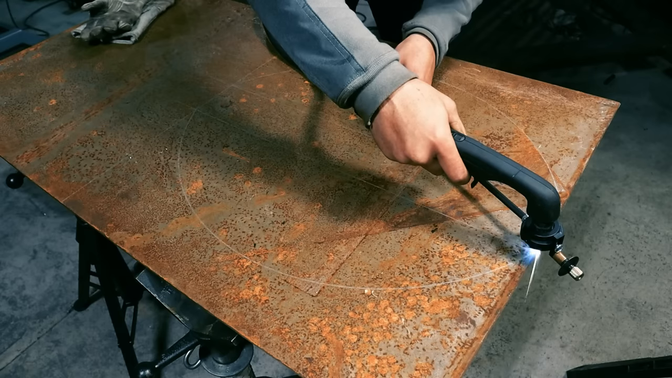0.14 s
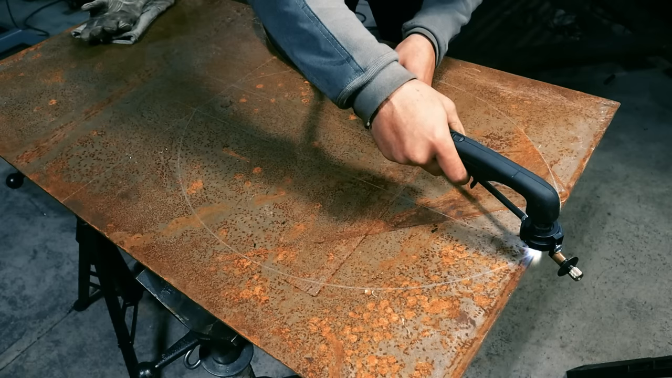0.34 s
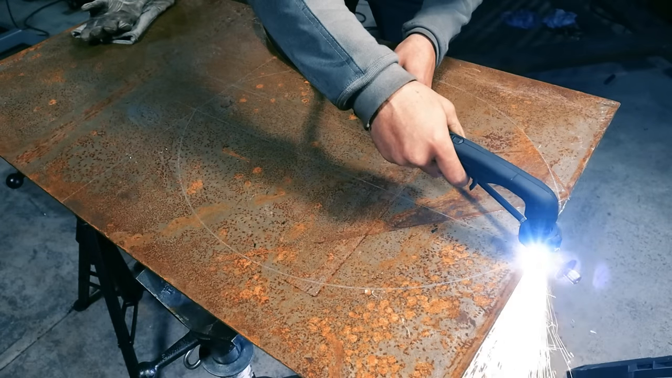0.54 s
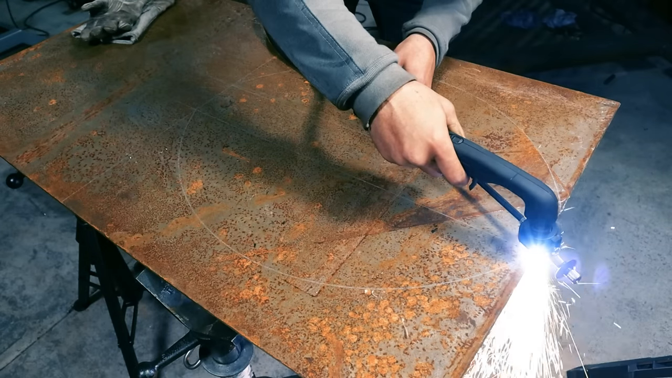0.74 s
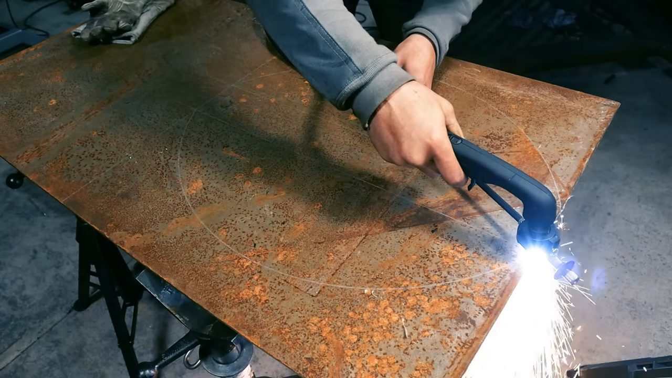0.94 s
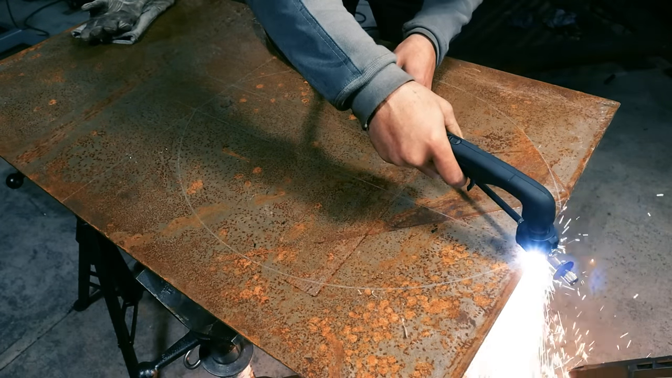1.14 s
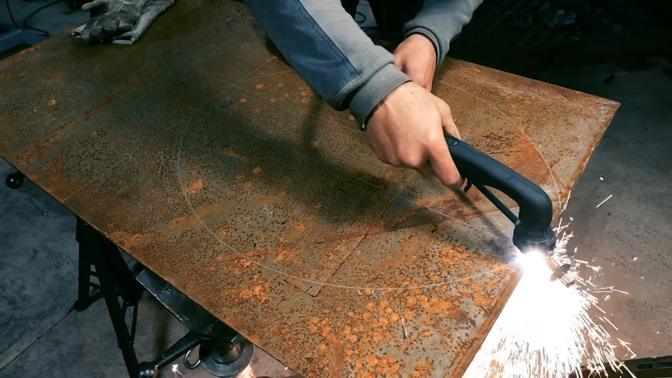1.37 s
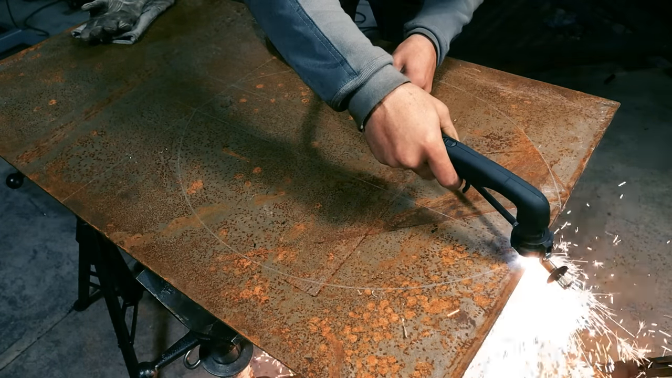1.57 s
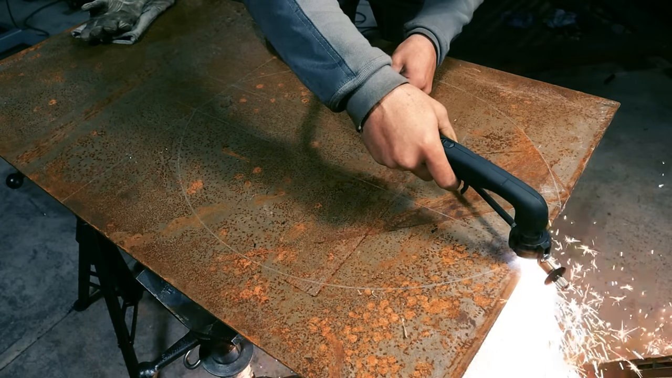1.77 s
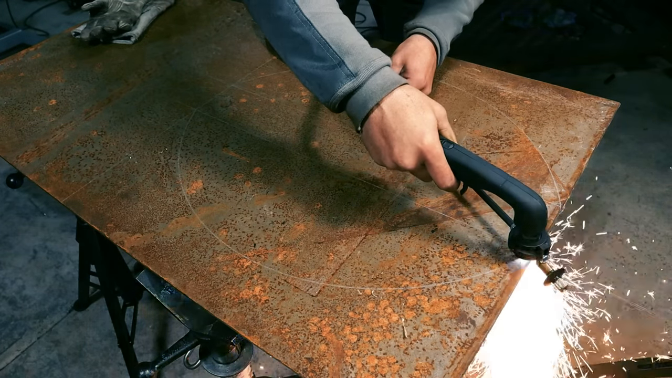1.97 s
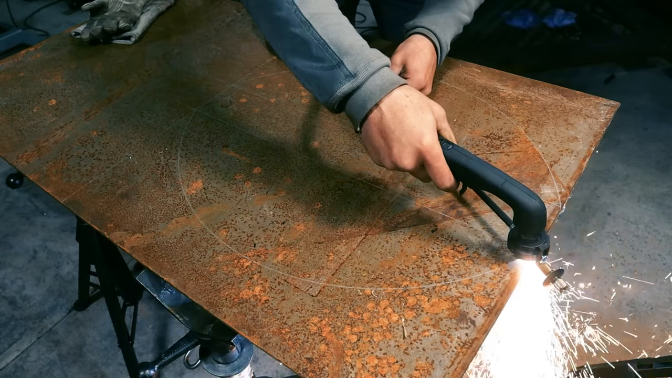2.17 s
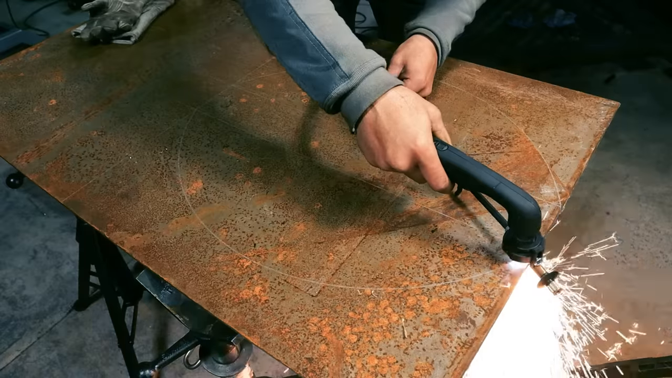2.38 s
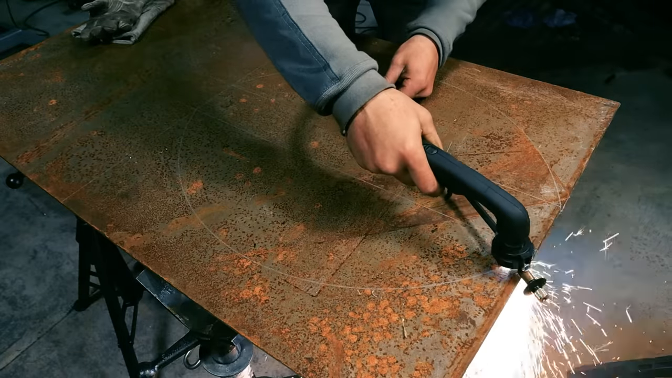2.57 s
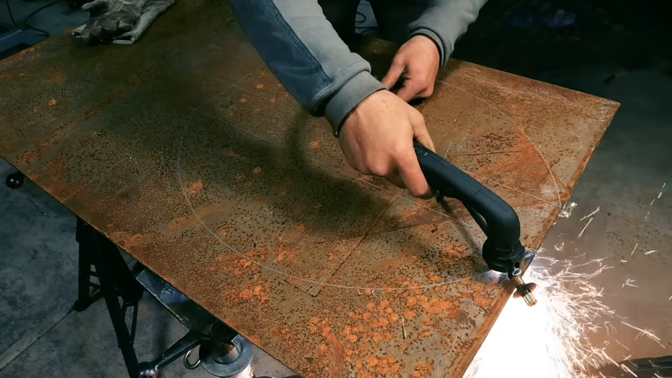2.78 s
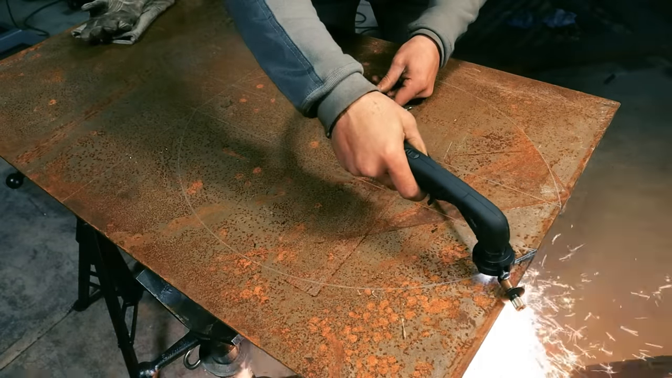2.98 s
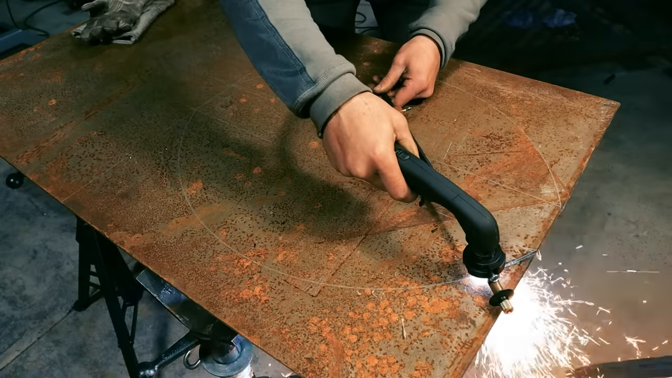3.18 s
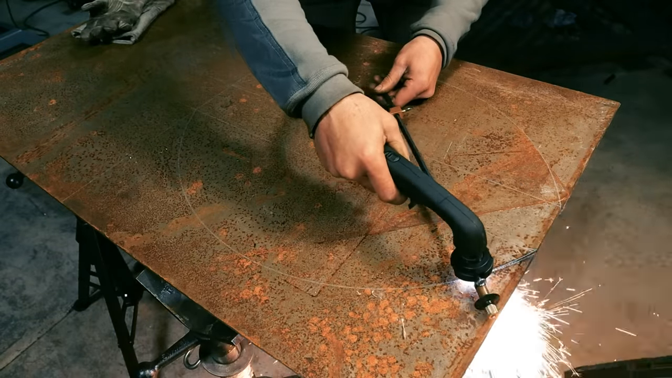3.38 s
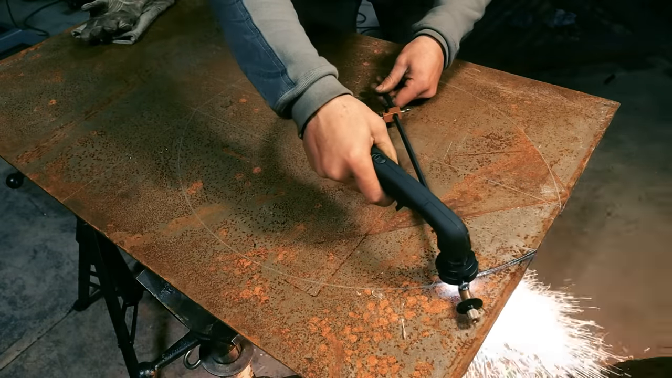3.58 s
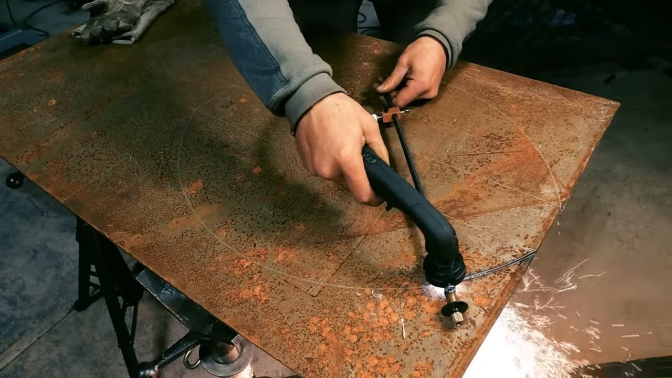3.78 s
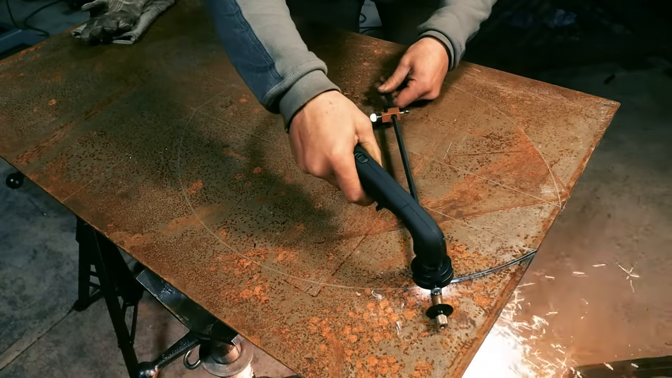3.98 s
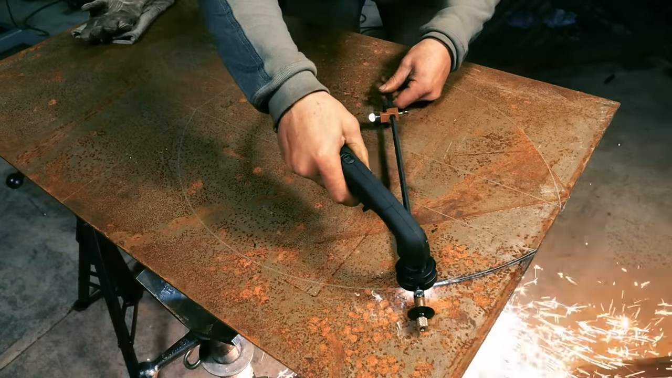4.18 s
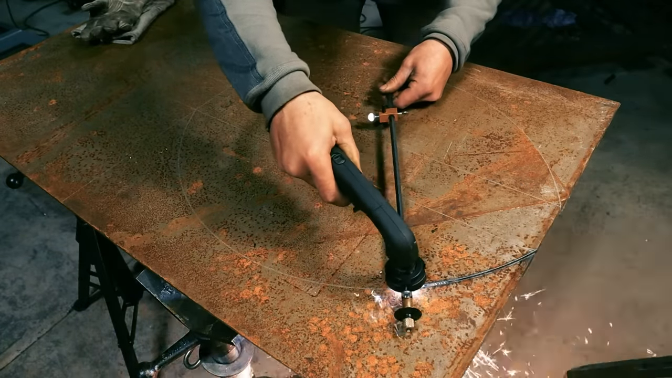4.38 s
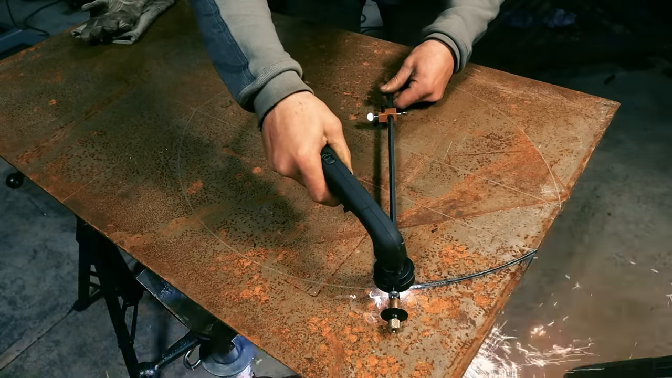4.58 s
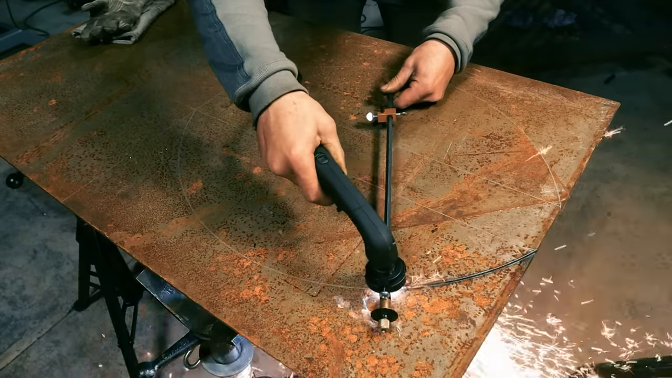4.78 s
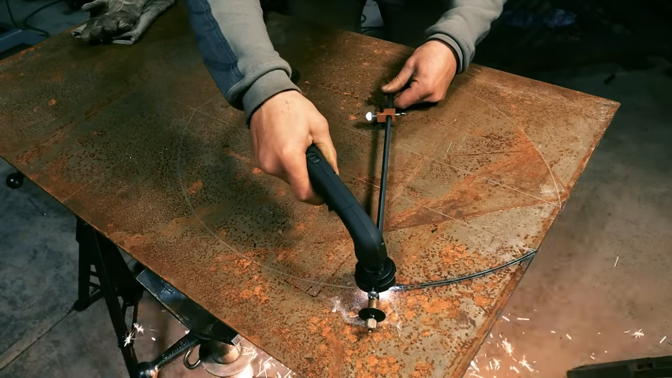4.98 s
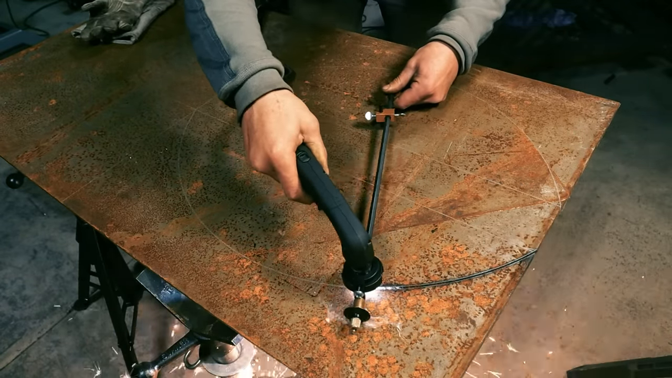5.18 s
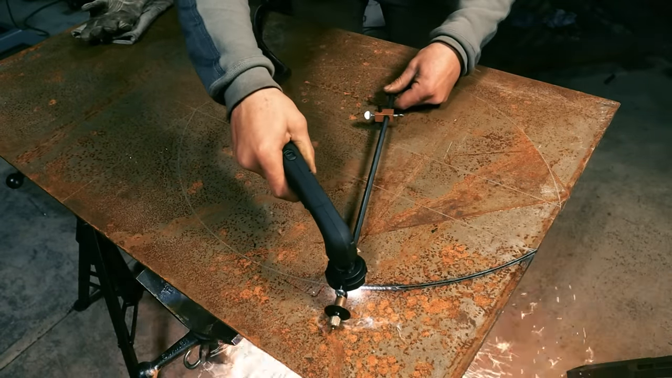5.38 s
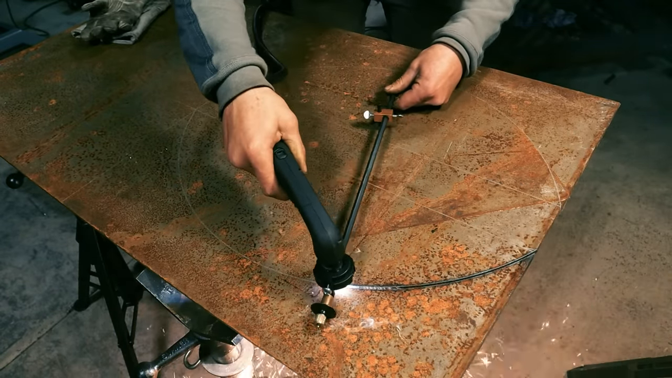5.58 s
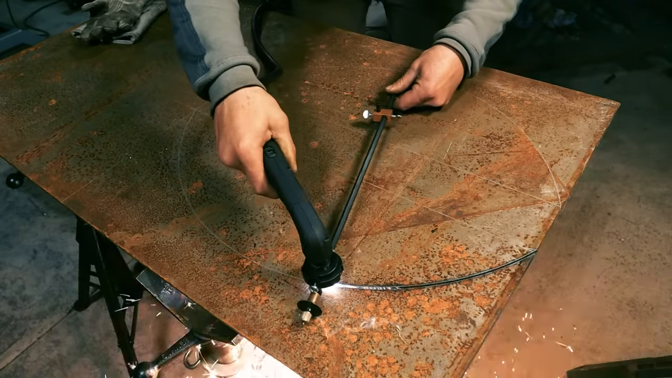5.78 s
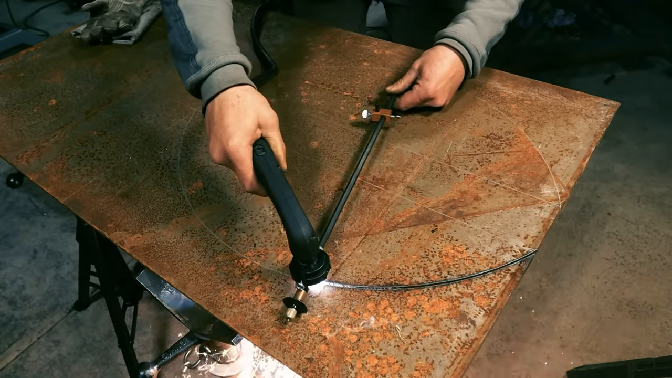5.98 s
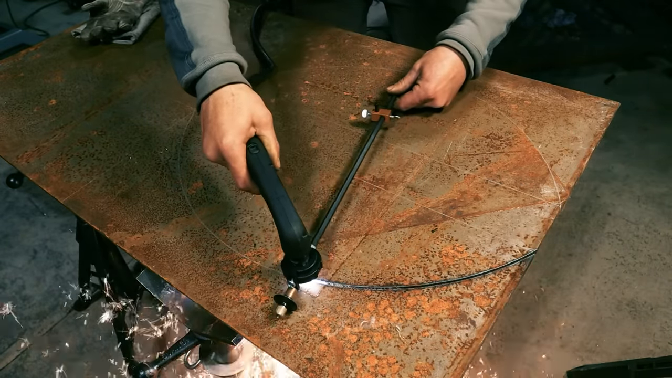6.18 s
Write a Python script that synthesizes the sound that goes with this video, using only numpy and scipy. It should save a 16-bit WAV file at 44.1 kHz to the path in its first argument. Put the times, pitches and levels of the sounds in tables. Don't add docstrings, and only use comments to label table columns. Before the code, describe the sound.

Digital silence until about 0.18 s, when a crisp double snap of a plastic trigger with a tiny rattle and brief ring appears over faint workshop noise. At 0.23 s air arrives with a bright tick and soft thud; at 0.265 s the plasma arc catches with a loud, slightly overloaded burst that settles quickly. A small breakthrough pop follows near 0.57 s, the lower roar filling out afterwards. The arc roars as dense, bright turbulent noise, strongest in the upper mids, easing slowly, dipping around 1.47 s and recovering. At 2.38 s it switches abruptly, without a fade, to a hiss roughly 20 dB quieter, thin, high and patchy, with little low body. It flickers with millisecond dips and surges, sags near 4.7 s, has a faint spark tick at 4.86 s, and continues to the end around 6 s. Close perspective, short hard workshop reflections, mostly centred.

```python
import sys
import numpy as np
from scipy import signal
from scipy.fft import rfft, irfft
from scipy.io import wavfile
from scipy.ndimage import uniform_filter1d

SR = 44100
rng = np.random.default_rng(int(sys.argv[2]) if len(sys.argv) > 2 else 0)


def master(y):
    cut = np.clip(np.atleast_2d(y).T, -1, 1)
    pcm = np.round(cut * 32767)
    wavfile.write(sys.argv[1], SR, pcm.astype(np.int16))


def decibels_to_gain(level_db):
    exponent = np.asarray(level_db, float) / 20
    return 10 ** exponent


N = 275184


def evened(x):
    return x / np.sqrt(np.mean(x ** 2) + 1e-20)


def read(points, hz):
    f, value = np.transpose(points)
    return np.interp(np.log(hz + 1), np.log(f + 1), value)


def add(mix, s, sound):
    mix[round(s * SR):][:len(sound)] += sound


def coloured(x, spectrum, peaks=()):
    hz = np.fft.rfftfreq(len(x), 1 / SR)
    bumps_db = sum(db / (1 + (2 * (hz - f) / width) ** 2) for f, width, db in peaks)
    gain = decibels_to_gain(read(spectrum, hz) + bumps_db)
    band = (hz > 2000) & (hz < 7000)
    return irfft(rfft(x) * gain, len(x)) / np.sqrt(np.sum(gain[band] ** 2) / len(hz))


def bandpassed_noise(count, low_hz, high_hz):
    sos = signal.butter(2, [low_hz, high_hz], "bandpass", fs=SR, output="sos")
    return evened(signal.sosfilt(sos, rng.standard_normal(count)))


def reflected(x, echo_db, t60, band_hz):
    delay = rng.uniform(.006, .12, 200)
    taps = np.zeros(6000)
    taps[(delay * SR).astype(int)] = rng.choice([-1., 1.], 200) * decibels_to_gain(echo_db - 60 * delay / t60)
    taps = signal.lfilter(*signal.butter(1, band_hz, "bandpass", fs=SR), taps)
    taps[0] = 1
    return signal.oaconvolve(x, taps)[:len(x)]


# (t/s, level/dB, length/s)
SURGES = [(0.454, 3, 0.0079), (0.55, -3, 0.019), (1.49, -2, 0.016), (1.538, 0.5, 0.011), (2.01, 1, 0.034),
          (2.778, -3.5, 0.029), (2.638, 0.5, 0.013), (2.86, 0.5, 0.033), (3.242, -4, .02),
          (3.816, 0.5, 0.012), (3.44, -3.5, 0.036), (4.252, -5.5, 0.026), (4.81, 2.5, 0.015),
          (4.848, 1, .008), (5.036, -4.5, 0.0088), (5.05, 4.5, 0.012), (5.13, -3, .01), (5.145, 3, 0.014),
          (5.409, -6.5, 0.018), (5.824, 1, 0.0098), (5.897, -5, 0.011)]


def jet(levels, patchy_db, drift_db, sputter_db, flicker_db):
    frames, hz = N // 64 + 5, np.fft.rfftfreq(256, 1 / SR)[:, None]
    t = np.arange(frames) * 64 / SR
    roar_db, jet_db, fizz_db, sizzle_db = levels(t)
    a, b, patches, drift = rng.standard_normal((frames, 129, 4)).T

    patches = evened(uniform_filter1d(uniform_filter1d(patches, size=5, axis=0), size=30, axis=1))
    drift = evened(uniform_filter1d(uniform_filter1d(drift, size=3, axis=0), size=300, axis=1))
    sputter = evened(uniform_filter1d(uniform_filter1d(rng.standard_normal(frames), size=12), size=12))
    flicker = evened(uniform_filter1d(rng.standard_normal(frames), size=3))
    surge_db = sum(db * np.exp(-((t - at) / length) ** 2) for at, db, length in SURGES)

    low, high, top = (1 / (1 + (edge / (hz + 1)) ** 8) for edge in (2000, 6500, 10000))
    field_db = (1 - low) * roar_db + (low - high) * jet_db + (high - top) * fizz_db + top * sizzle_db
    field_db = field_db + patchy_db * patches + drift_db * drift
    unsteady_db = sputter_db * sputter + flicker_db * flicker + surge_db
    field_db = field_db + unsteady_db * (1 - .25 * high - .4 * top)
    return signal.istft((a + 1j * b) * decibels_to_gain(field_db), nperseg=256, noverlap=192)[1][:N] / 11.3


def cutting(rows, follow, t):
    s, power_db, lift_db = np.transpose(rows)
    offset_db, power, lift, creep = np.transpose(follow)[:, :, None]
    level_db = power_db.mean() + offset_db + creep * (t - s.mean()) + lift * np.interp(t, s, lift_db)
    return level_db + power * np.interp(t, s, power_db - power_db.mean())


# (air alone level/dB, its climb/dB per s, strike flash level/dB, flash fade/s)
IGNITION = [
    (-18, -250, 17, 0.015),
    (-40, 430, 8.5, 0.018),
    (-58, 350, 7, 0.17),
    (-52.5, 650, 4, .03),
]


def struck(level_db, t):
    air_s, arc_s, rise_s = .230, .2635, .004
    air_db, climb, flash_db, fade = np.transpose(IGNITION)[:, :, None]
    air = decibels_to_gain(air_db + climb * np.clip(t - air_s, 0, arc_s - air_s)) * np.clip((t - air_s) / rise_s, 0, 1) ** 2
    lit = np.clip((t - arc_s) / rise_s, 0, 1)
    held_db = np.outer([-0.5, 0, 0, 0], t < 0.64)
    arc = decibels_to_gain(level_db + held_db + flash_db * np.exp(-np.maximum(t - arc_s - rise_s, 0) / fade))
    return 20 * np.log10((1 - lit) * air + lit * arc + 1e-6)


# (t/s, arc power level/dB, torch lift level/dB)
AT_EDGE = [(.33, -22.5, 0.5), (.55, -22, -.5), (.85, -23, -1), (1.15, -24, -1.5), (1.47, -28, 1.5),
           (1.56, -23.5, 2), (1.73, -26.5, 2), (2.0, -24.5, 1), (2.37, -25, 0)]
# (offset level/dB, share of arc power, share of torch lift, creep/dB per s)
EDGE_FOLLOW = [
    (-1.5, 1, .3, 1.3),
    (-1.5, 0.83, 0, 0),
    (-2, 0.39, .4, -1.5),
    (-2, 0.61, 1.0, -1.2),
]
# (f/Hz, level/dB per Hz)
EDGE_COLOUR = [(25, -45), (120, -33), (300, -24), (600, -25.5), (1100, -10), (1900, -9.5), (3400, -2),
               (4100, -6.5), (5200, -6.5), (7600, -10.5), (9500, -6.5), (12700, -11.5), (14400, -8),
               (15700, -21.5)]
# (f/Hz, width/Hz, level/dB)
EDGE_PEAKS = [(480, 90, 7.0), (660, 150, 7.0), (880, 410, 7.0), (1050, 140, -5.5), (1210, 230, -4.5),
              (1530, 160, -3.0), (1900, 90, -2.0), (2360, 200, 2.5), (2500, 170, -2.0), (2860, 80, 3.0),
              (3560, 180, 3.0), (3750, 80, 2.5), (4470, 500, 2.0), (5010, 500, 4.0), (5320, 130, -2.0),
              (5620, 130, 3.0), (6200, 370, 2.0), (6730, 120, 1.5), (7380, 60, 1.5), (8030, 70, 1.5),
              (8350, 90, -3.0), (8450, 130, 2.0), (10140, 330, -4.0), (10490, 500, 2.0), (11030, 360, 3.5),
              (11160, 170, -4.5), (14200, 290, -2.5), (15690, 480, 7.0)]


def edge_cut():
    arc = jet(lambda t: struck(cutting(AT_EDGE, EDGE_FOLLOW, t), t),
              patchy_db=0.6, drift_db=0.5, sputter_db=-0.04, flicker_db=0.38)
    arc = decibels_to_gain(1.5) * coloured(arc, EDGE_COLOUR, EDGE_PEAKS)
    return reflected(arc, echo_db=-25, t60=.35, band_hz=[400, 12000])


# (t/s, arc power level/dB, torch lift level/dB)
INSIDE_CUT = [(2.4, -43.5, 1), (2.85, -43, 0), (3.35, -44, -0.77), (3.55, -43.5, 0.9), (4.0, -45.5, -0.097),
              (4.45, -45, 0), (4.72, -48.5, 0), (5.1, -45.5, 0), (6.2, -45, -1)]
# (offset level/dB, share of arc power, share of torch lift, creep/dB per s)
INSIDE_FOLLOW = [
    (-1.5, 0.89, .3, -0.2),
    (-1.72, 0.77, 0.17, 0),
    (-1.3, 0.51, .4, -0.54),
    (-1.2, 0.35, 1.0, -0.6),
]
# (f/Hz, level/dB per Hz)
INSIDE_COLOUR = [(25, -43.5), (120, -43.5), (300, -34.5), (600, -24.5), (1000, -22.5), (1500, -12.0),
                 (2500, -13.5), (3200, -1.5), (4000, -18.5), (5000, -3.0), (7000, -9.5), (9500, -6.5),
                 (13000, -4.5), (15700, -1.0)]
# (f/Hz, width/Hz, level/dB)
INSIDE_PEAKS = [(540, 60, -2.5), (690, 90, -3.5), (860, 130, -3.0), (1310, 200, -5.5), (1600, 130, -5.0),
                (1950, 70, -4.0), (2170, 170, -3.5), (2590, 120, -6.5), (2720, 50, -4.0), (2910, 60, -4.0),
                (3090, 90, -7.0), (3320, 500, -5.5), (3600, 60, 4.0), (3730, 50, 2.5), (4050, 430, 7.0),
                (4370, 160, 7.0), (4820, 80, 4.0), (5270, 60, -5.0), (5820, 170, 4.5), (6110, 50, 4.5),
                (6400, 50, 4.0), (6670, 500, 4.5), (7380, 180, 4.5), (8100, 370, 3.0), (9170, 380, 1.5),
                (9770, 250, -2.0), (11960, 50, 2.5), (13600, 260, -2.0)]


def inside_cut():
    arc = jet(lambda t: cutting(INSIDE_CUT, INSIDE_FOLLOW, t),
              patchy_db=1.2, drift_db=0.52, sputter_db=0.7, flicker_db=1.16)
    arc = decibels_to_gain(3.0) * coloured(arc, INSIDE_COLOUR, INSIDE_PEAKS)
    return reflected(arc, echo_db=-21, t60=0.25, band_hz=[400, 10000])


# (t/s, level/dB, low f/Hz, high f/Hz, t60/s)
PUFFS = [
    (.2325, -38, 300, 800, .1),
    (.2405, -38, 60, 400, .03),
    (.2395, -31, 1500, 4500, .012),
    (.2655, -24, 250, 650, .02),
    (.574, -33, 60, 1500, .025),
    (4.861, -38, 3300, 5200, .025),
    (4.862, -50, 700, 2600, .02),
]
# (t/s, level/dB)
SPATTER = [(2.85, -90), (3.06, -88), (3.2, -82), (3.24, -88), (3.46, -90), (3.71, -86), (4.27, -88),
           (4.86, -86), (5.47, -84)]
# (t/s, level/dB)
THUMPS = [
    (0.2405, -29.5),
    (0.2662, -30),
    (0.5732, -43),
]


def pops():
    out, t = np.zeros(N), np.arange(3000) / SR
    for s, db, low_hz, high_hz, t60 in PUFFS:
        envelope = decibels_to_gain(db - 60 * t / t60) * np.minimum(t / 0.0013, 1)
        add(out, s, envelope * bandpassed_noise(len(t), low_hz, high_hz))
    push = np.e * t / 0.00062 * np.exp(-t / .001)
    for s, db in SPATTER:
        add(out, s, decibels_to_gain(db) * push)
    thump = signal.lfilter(*signal.butter(2, 112, "highpass", fs=SR), push)
    for s, db in THUMPS:
        add(out, s, decibels_to_gain(db) * thump)
    return out


# (f/Hz, level/dB per Hz)
TRIGGER = [(100, -20), (700, -16), (1700, -20), (2400, -5), (3600, -4), (4700, 0), (5300, -2), (6200, -16),
           (7800, -9), (9500, -17), (12000, -13), (15700, -20)]
# (f/Hz, level/dB, length/s)
LATCH = [
    (4700, -22, 0.0017),
    (3100, -28.5, 0.0012),
]


def trigger():
    out, t = np.zeros(N), np.arange(2048) / SR - .004
    snaps = np.zeros(len(t))
    snaps[[161, 176]] = [-.3, 1]
    snaps = coloured(snaps, TRIGGER, [(4850, 700, 7), (3000, 900, 4)])
    snaps = decibels_to_gain(-25) * snaps / abs(snaps).max() * np.exp(-(t / .003) ** 2)
    rattle = evened(coloured(rng.standard_normal(len(t)), TRIGGER))
    rattle = rattle * decibels_to_gain(-38 - 60 * abs(t) / np.where(t > 0, .035, .008))
    add(out, .1799, snaps + rattle)
    for hz, db, length in LATCH:
        u = np.arange(0, length, 1 / SR)
        ring = np.sin(2 * np.pi * hz * u) * np.sin(np.pi * (u / length) ** 0.52)
        add(out, .1835, decibels_to_gain(db) * ring)
    return out


# (f/Hz, level/dB per Hz)
SHOP = [(30, -14), (300, 5), (700, 0), (1500, -2), (3000, -10.5), (4500, 2.5), (6000, -16), (15700, -18.5)]


def idle_shop():
    return decibels_to_gain(-57) * evened(coloured(rng.standard_normal(N), SHOP))


def scene():
    start_s, change_s = .1757, 2.3783
    t = np.arange(N) / SR
    edge = edge_cut() + trigger() + idle_shop()
    cuts = np.where(t < change_s, edge, inside_cut()) * (t > start_s)
    return np.tile(cuts + pops(), (2, 1))


# (t/s, bands filled)
FILLED = [(1.062, 2), (1.248, 1), (1.271, 2), (1.364, 1), (1.55, 3), (1.759, 1), (1.782, 3), (2.363, 2),
          (2.734, 1), (4.476, 4), (4.545, 1), (4.778, 2), (5.497, 2), (5.753, 2)]


def widened(x):
    band_edges_hz = np.linspace(4500, 15800, 8)
    n, fade = np.arange(2048), signal.windows.kaiser_bessel_derived(2048, 4 * np.pi)
    all_bins = np.arange(732)
    band = np.digitize(all_bins * SR / 2048, band_edges_hz) - 1
    for (s, count), chance in zip(FILLED, rng.random((len(FILLED), len(band_edges_hz) - 1))):
        at = 750 + 1024 * round((s * SR - 750) / 1024) - 1024
        bins = all_bins[np.isin(band, np.argsort(chance)[:count])]
        waves = fade * np.cos(np.pi / 1024 * np.outer(bins + .5, n + 512.5))
        level = np.sqrt(uniform_filter1d((waves @ x[0, at:at + 2048]) ** 2, size=60)) / 512
        noise = level * rng.standard_normal(len(bins)) @ waves
        x[:, at:at + 2048] += decibels_to_gain(-5.0) * np.outer([1, -1], noise)
    return x


def top_cut(x):
    return signal.sosfilt(signal.butter(12, 17070, fs=SR, output="sos"), x)


def record(dry):
    overloaded = 0.6 * np.tanh(dry / 0.51)
    lowpass = signal.firwin(1501, 15750, window=("kaiser", 9), fs=SR)
    mix = widened(signal.oaconvolve(overloaded, lowpass[None], "same"))
    return top_cut(mix)


dry = scene()
out = record(dry)
master(out)
```